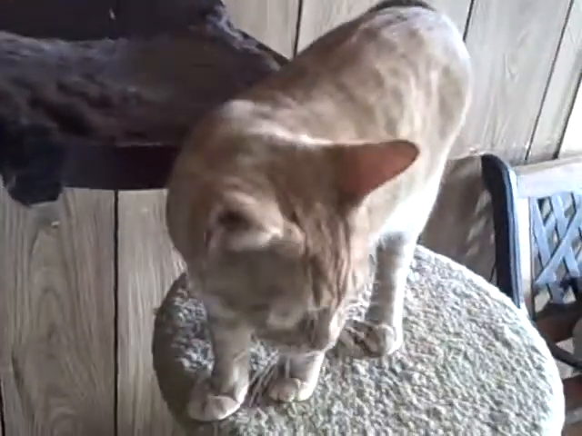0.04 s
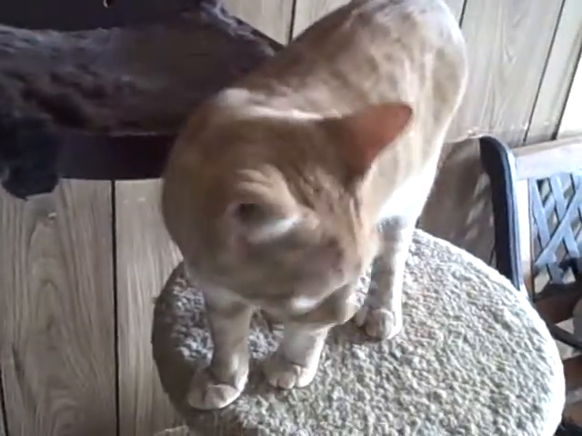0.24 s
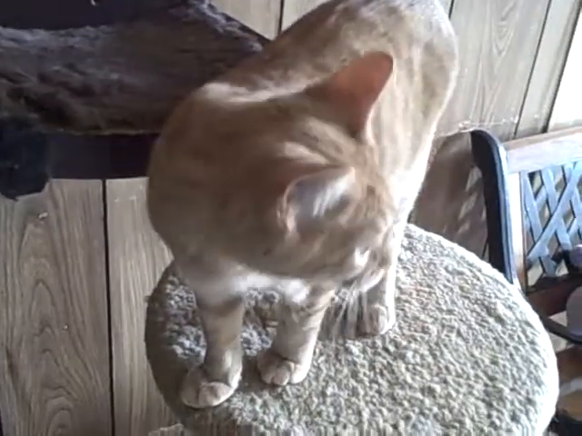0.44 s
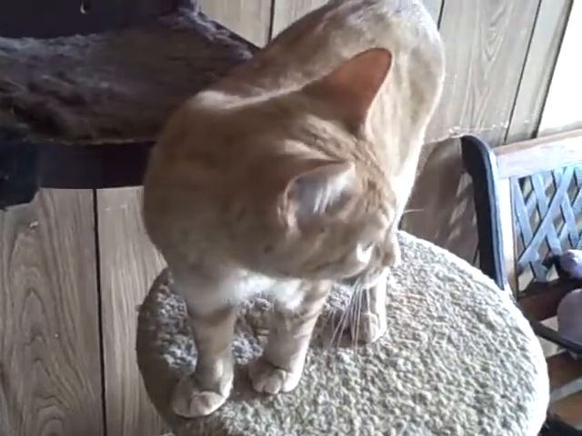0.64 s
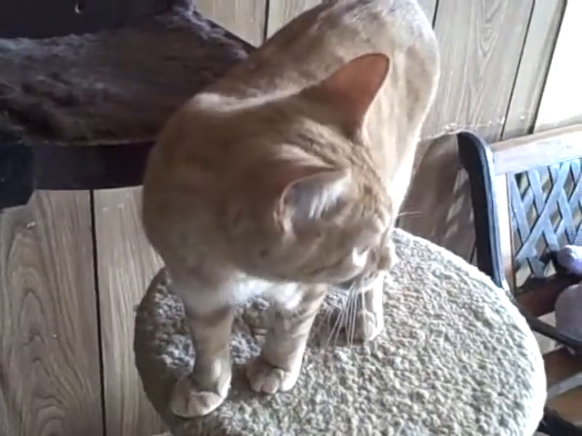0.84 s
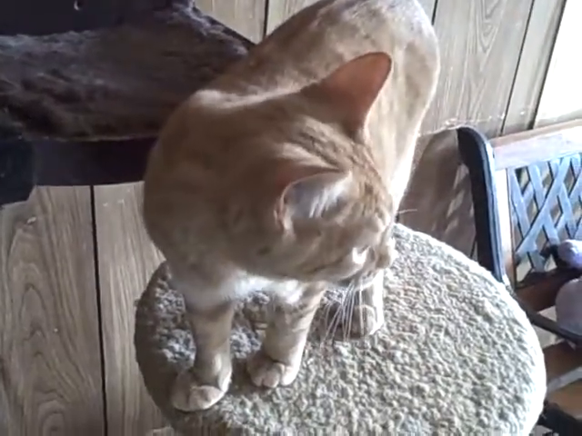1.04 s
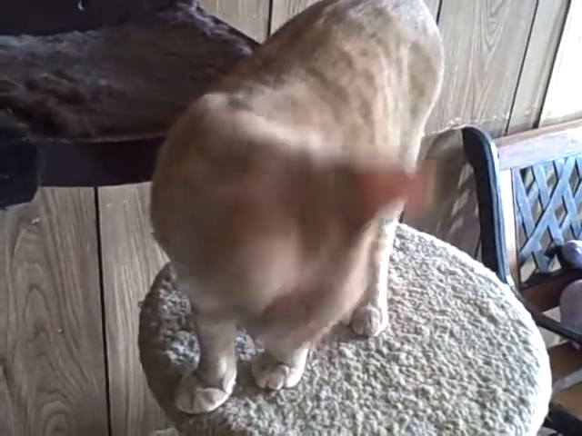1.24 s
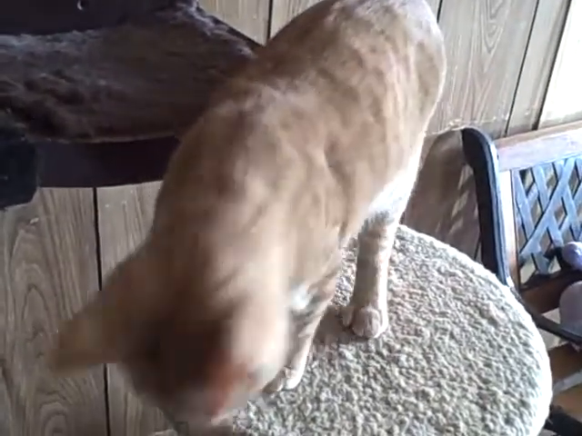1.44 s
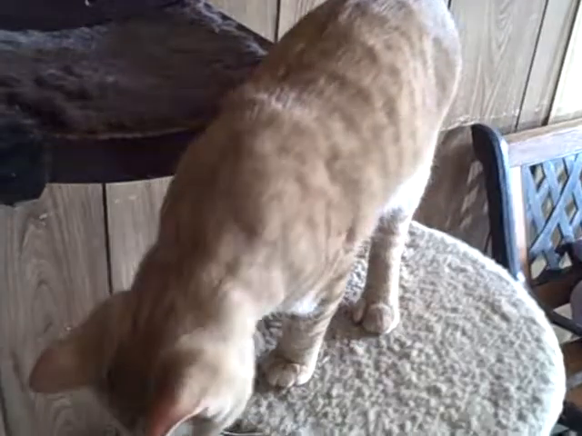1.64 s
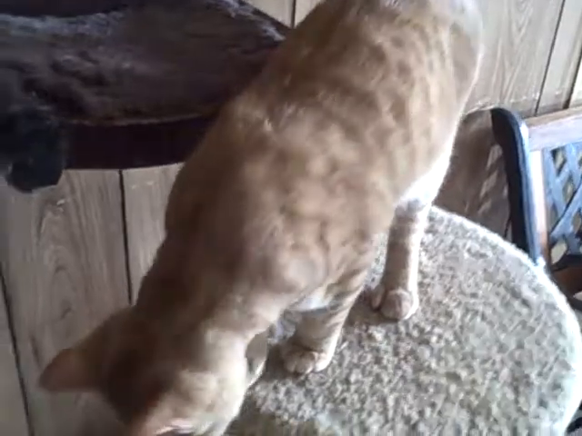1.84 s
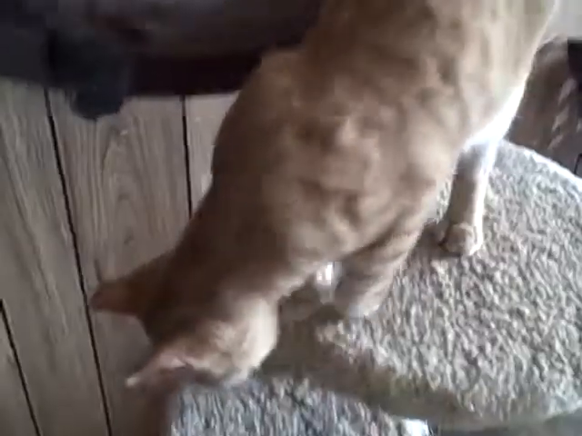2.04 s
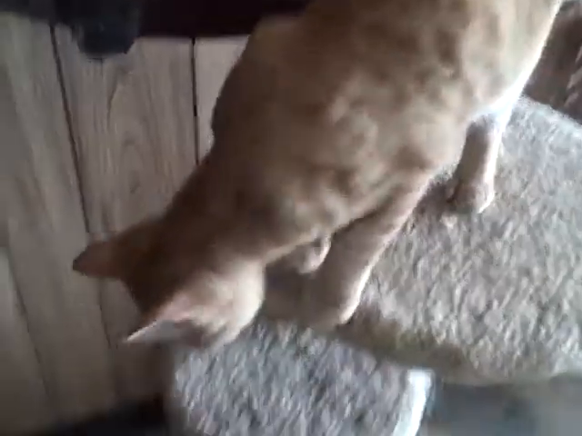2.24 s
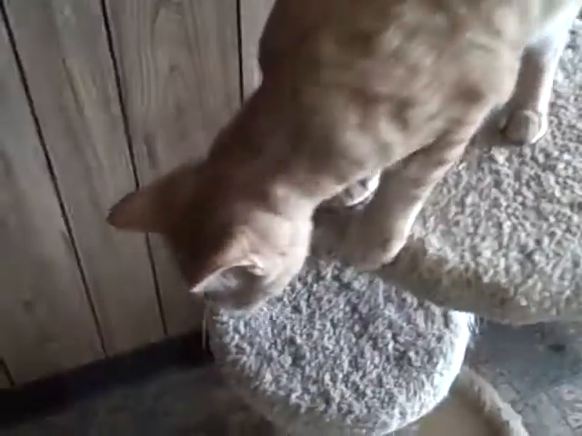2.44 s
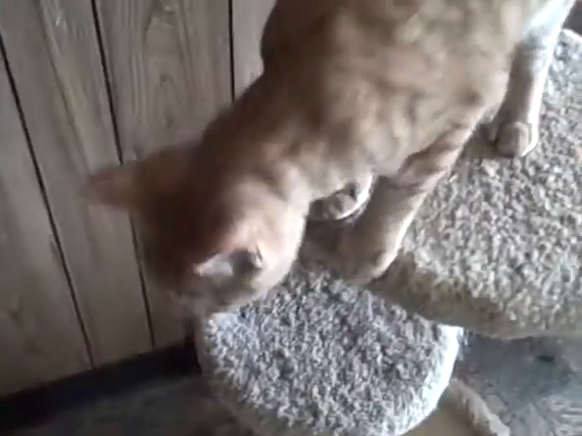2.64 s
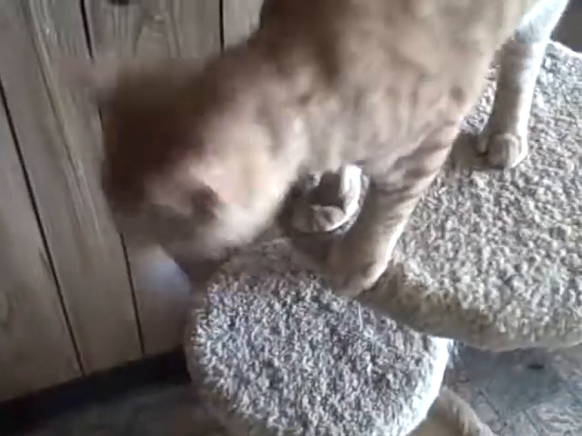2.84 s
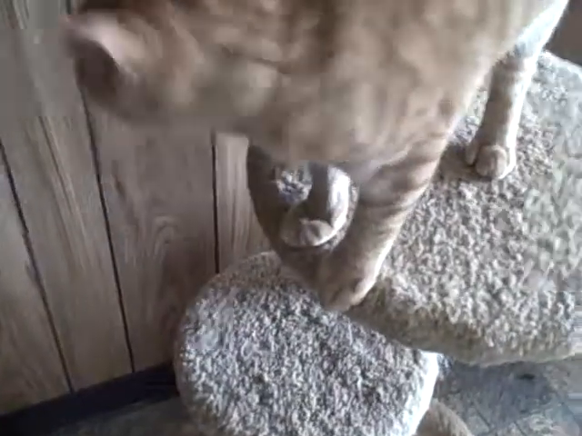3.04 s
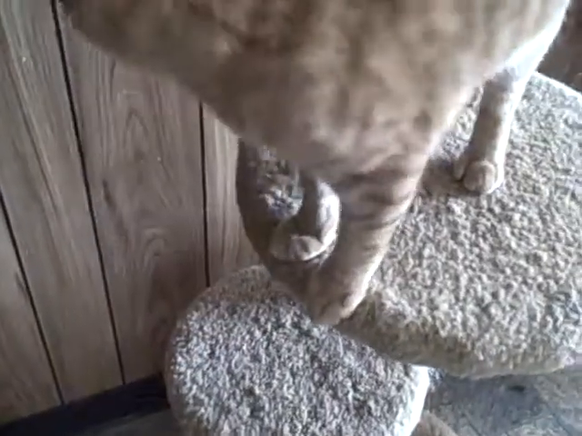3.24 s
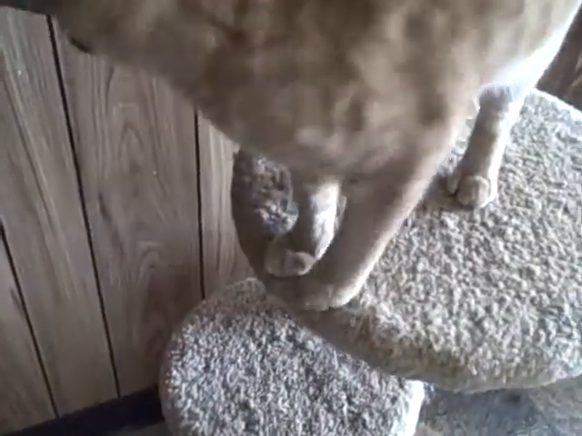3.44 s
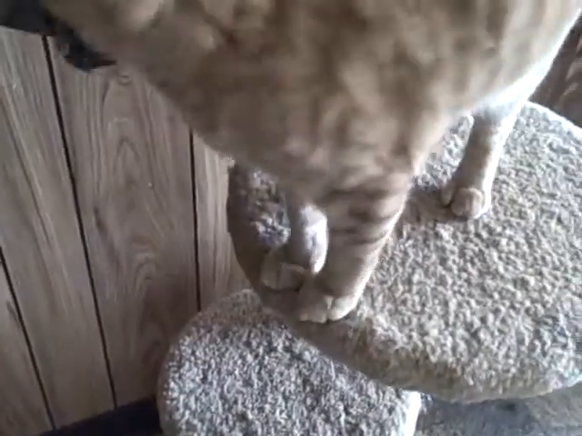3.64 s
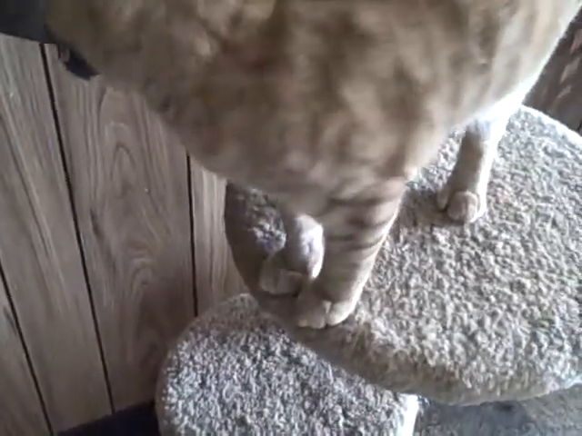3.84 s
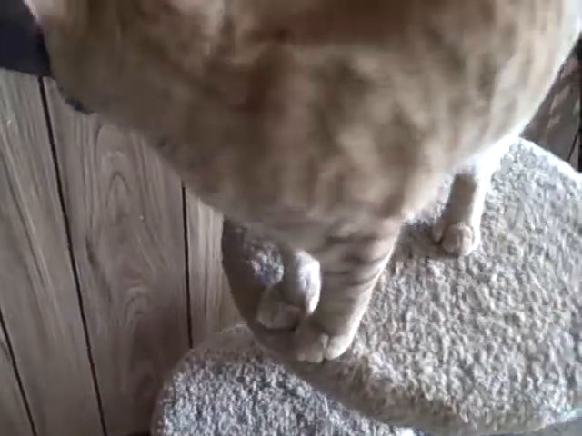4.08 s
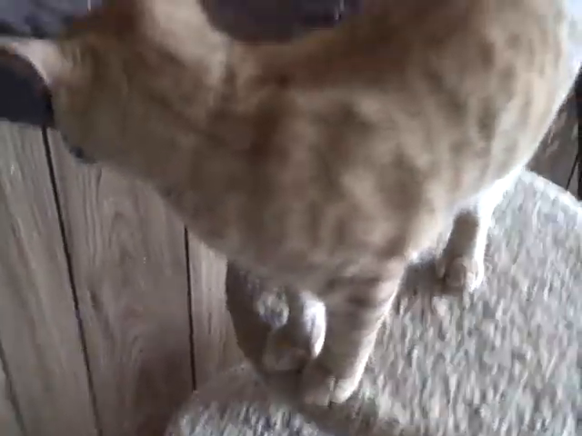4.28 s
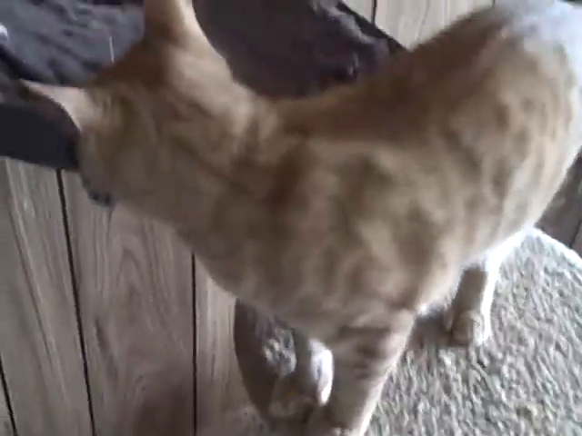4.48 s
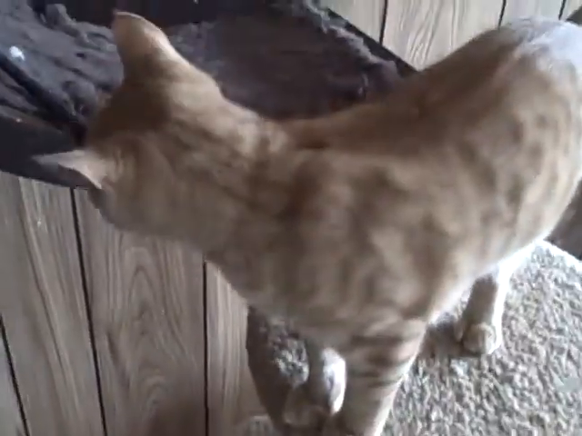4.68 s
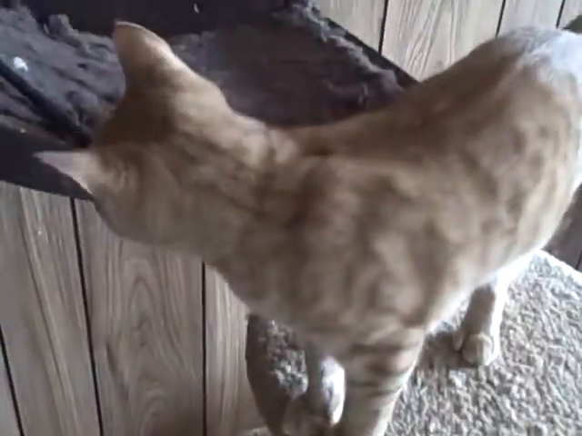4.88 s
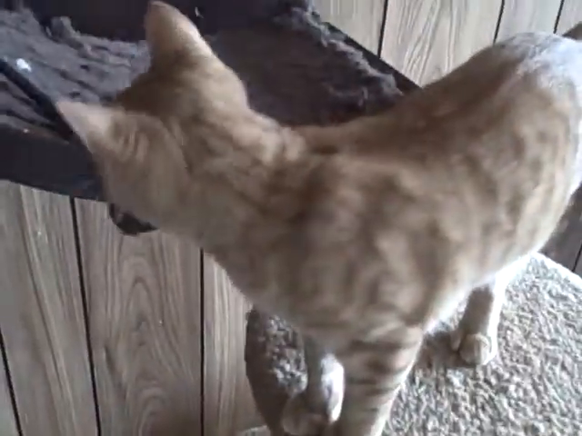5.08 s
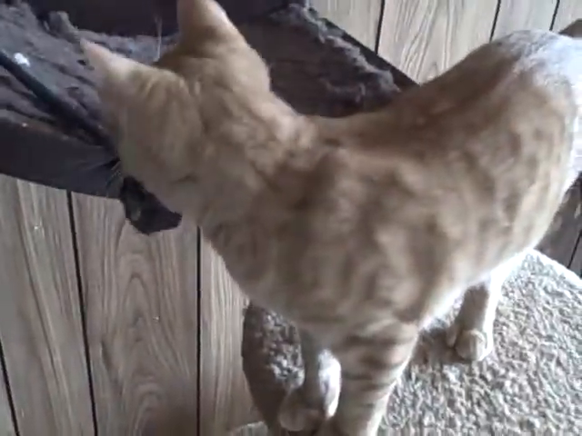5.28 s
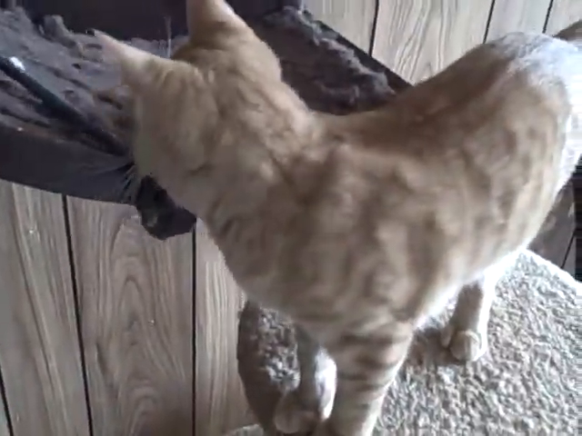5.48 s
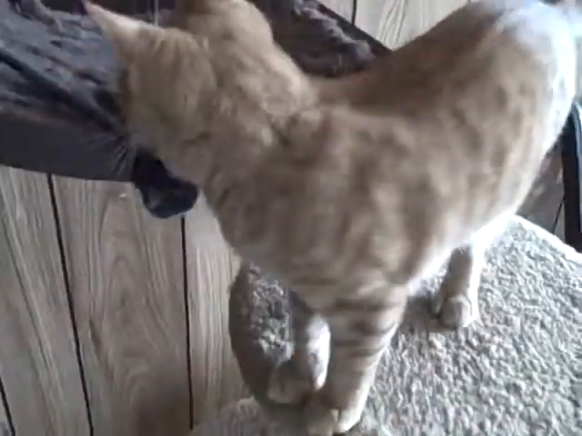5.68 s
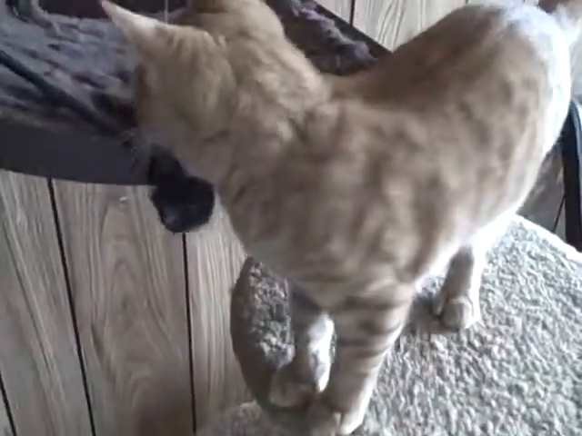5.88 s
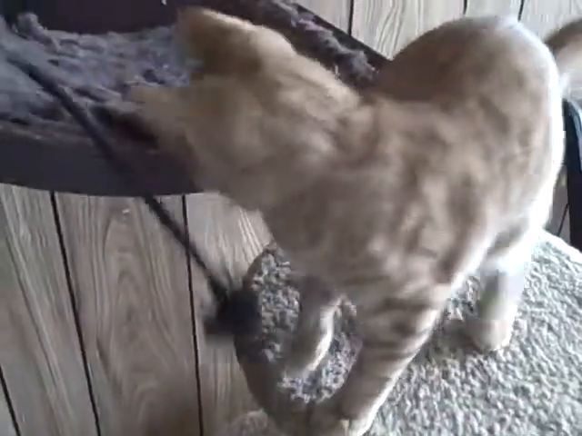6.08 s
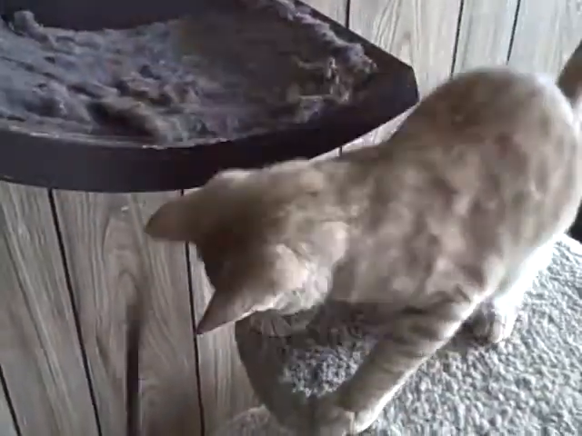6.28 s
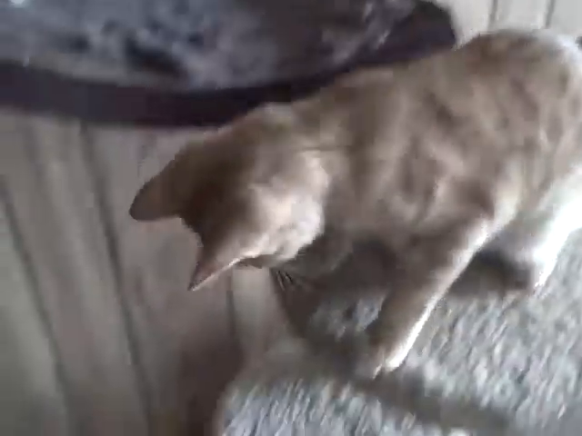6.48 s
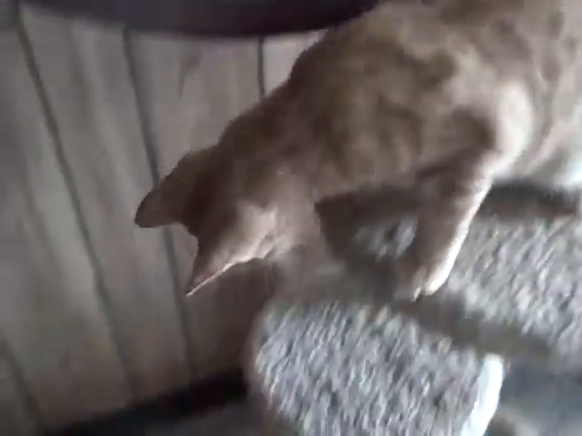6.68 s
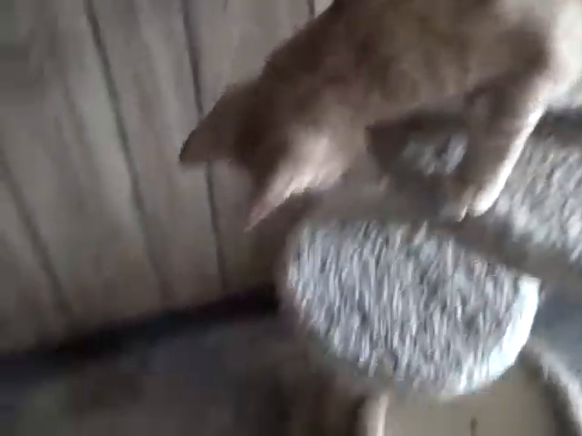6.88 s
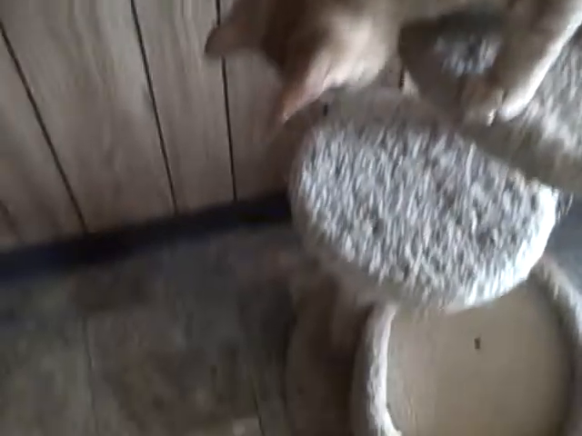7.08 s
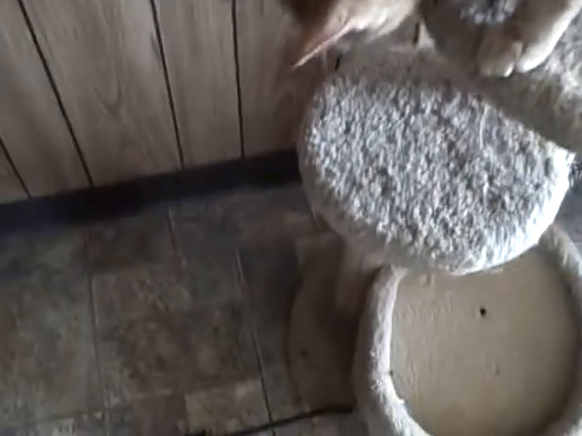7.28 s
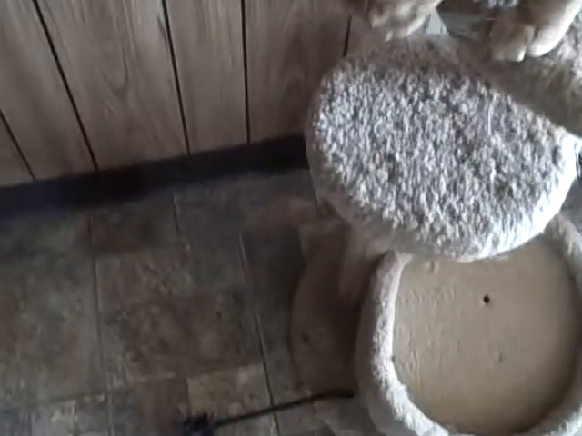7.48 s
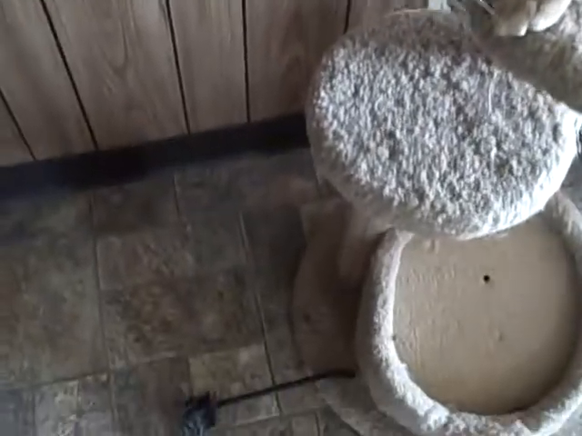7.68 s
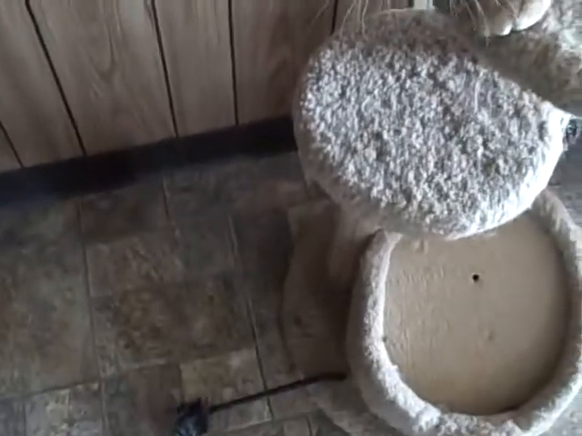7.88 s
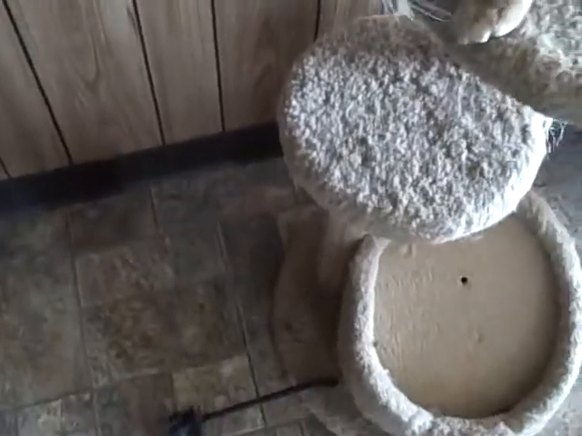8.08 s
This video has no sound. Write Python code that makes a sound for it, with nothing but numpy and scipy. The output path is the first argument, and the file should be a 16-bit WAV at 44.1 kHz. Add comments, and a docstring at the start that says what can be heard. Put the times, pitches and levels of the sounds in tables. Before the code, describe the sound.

A small cat shifts on a carpeted cat tree with faint wooden knocks and claw ticks, then a toy wand clacks sharply onto tiles and rattles.

```python
"""A cat shifts about on a carpeted wooden tree in a small panelled room, near a phone. Boards thud as sums of
fading sines; claws and a toy wand tick as short noise through small ringing bodies. Fur and cloth scuff as
clumpy noise, some hits trail off in the same grainy rattle, a joint creaks as a rising noise band, and the wand
drops to the tiles and bounces. A faint high whistle slides up and stops. Steady shaped noise makes the hiss and
low household rumble, and a second, uneven noise layer makes the cat's shifting weight. Random taps add the
room's echo."""
import sys
import numpy as np
from scipy import signal
from scipy.fft import rfft, irfft
from scipy.io import wavfile
from scipy.ndimage import uniform_filter1d

SR = 44100
rng = np.random.default_rng(int(sys.argv[2]) if len(sys.argv) > 2 else 0)


def inscribe(sig):
    """Save sig as 16-bit PCM at rate SR to the path in sys.argv[1].

    A 1-D sig is mono; a 2-D sig holds one channel per row.
    Samples are clipped to [-1, 1] before scaling.
    """
    pcm = np.round(np.clip(np.atleast_2d(sig).T, -1, 1) * 32767)
    wavfile.write(sys.argv[1], SR, pcm.astype(np.int16))


N = 358091  # samples, about 8.1 s

# Microphone hiss and low household rumble, as a noise spectrum: (f/Hz, level/dB per Hz)
HISS_TONE = [(12, -14), (20, -4), (48, -2.5), (179, -0.5), (1240, -19), (2230, -19.5), (4030, -24.5),
             (15100, -28), (16400, -34.5)]
HISS_DB = -64  # rms

# Weight shifting on floor and tree, before the random lumps: (t/s, rms level/dB)
SHUFFLE_LEVELS = [(0.0, -61), (0.81, -69), (1.2, -64), (1.56, -75.5), (2.24, -64.5), (2.83, -69),
                  (3.82, -62), (3.98, -50), (4.16, -50), (4.32, -54), (4.43, -76), (4.93, -56), (5.22, -70),
                  (5.5, -65), (5.67, -65), (6.79, -58.5), (6.94, -66.5), (8.12, -62.5)]
# Spectrum of that shifting: (f/Hz, level/dB per Hz)
SHUFFLE_SPECTRUM = [(15, 1), (30, 0.5), (60, -2.5), (120, -13.5), (250, -23.5), (500, -31.5), (1000, -49.5),
                    (3000, -74.5)]

# Fur, carpet and cloth rubbing, and the grainy rattle that trails some hits such as the wand drop: (start t/s,
# t60/s, rms level before the swell and fade/dB, centre f/Hz, width/octaves)
SCUFFS_AND_RATTLES = [(.01, 0.11, -63, 2360, 0.3), (.52, .36, -73.5, 4070, .8), (.865, 0.049, -61, 8900, 1.6),
                      (.96, 0.65, -72, 3500, 0.71), (1.07, 0.28, -61, 3400, 0.88), (2.489, 0.12, -56.5, 6000, 6.2),
                      (2.523, 0.27, -44, 2200, 1.9), (2.64, 0.38, -63, 2240, 1.55), (2.765, 0.31, -62, 2230, 1.84),
                      (2.978, 0.086, -60.5, 2290, 0.33), (3.19, 0.45, -61.5, 8000, 2.7), (3.283, 0.13, -63.5, 8000, 2.8),
                      (3.565, .37, -67, 1530, 1), (3.657, 0.28, -66.5, 4670, .6), (4.045, 0.26, -66, 4530, .5),
                      (4.33, 0.5, -66.5, 1460, 1), (4.8, .59, -66, 1900, 2.2), (5.545, 0.56, -55, 2290, 1.4),
                      (5.582, 0.073, -51, 13000, 1.4), (5.65, 0.21, -51, 5700, 0.63), (5.89, 0.24, -63, 3920, 1.06),
                      (6.115, 0.25, -65.5, 1540, 0.98), (6.184, 0.28, -47.5, 2360, 1.1), (6.3, 0.81, -62.5, 3930, 2.1),
                      (6.511, .09, -47.5, 10100, 2.5), (6.58, 0.057, -25, 8000, 7.8), (6.605, 0.26, -43, 8000, 1.1),
                      (6.665, 0.53, -54.5, 8100, 1.9), (6.81, 0.75, -55.5, 7750, 4.7), (7.075, 0.38, -67, 12900, .7),
                      (7.075, 0.18, -69, 2400, 0.5), (7.338, 0.5, -58.5, 2070, 1.64), (7.495, 0.39, -65, 1590, 1.2)]
SCUFF_RISE_S, FIRM_SCUFF_DB, RISE_HALVING_DB = .01, -56, 20  # a firmer stroke starts faster

# Dull knocks on wood: (t/s, peak level/dB, centre f of the woken modes/Hz, width/octaves, contact rise/ms)
KNOCKS = [(.152, -51, 171, 0.75, 8), (.303, -48, 292, 0.32, 7.7), (1.28, -48.5, 597, 3.2, 0.73),
          (1.713, -45.5, 112, 0.83, 7.9), (1.981, -47, 506, 3.6, 1.5), (2.0945, -28, 194, 0.19, 2.43),
          (2.523, -42, 925, 0.89, 7.3), (2.986, -43, 304, 1.4, 8.5), (3.254, -51.5, 80, 0.54, 4.1),
          (3.578, -50, 313, 0.91, 16), (3.63, -53.5, 330, 0.89, 11), (3.788, -47, 242, 1.46, 5),
          (3.814, -39.5, 99, 0.87, 3.1), (3.849, -46.5, 283, 0.51, 3.7), (3.998, -39.5, 410, 0.66, 2.5),
          (4.011, -32, 277, 0.63, 4.2), (4.158, -40.5, 164, 0.46, 9.8), (4.178, -43, 167, 0.93, 4.2),
          (4.223, -41.5, 1170, 1.53, 1.9), (4.308, -46, 161, 0.58, 6.4), (4.716, -44, 205, 0.57, 2.8),
          (4.799, -51, 695, 1.16, 14), (4.879, -47.5, 150, 1.36, 8.8), (5.04, -45.5, 130, 1.24, 6.7),
          (5.099, -52, 200, 0.89, 3.7), (5.562, -49, 326, 1.2, 12), (6.1425, -23, 195, 0.89, 2.45),
          (6.5785, -12, 340, 1.82, 1.33), (6.809, -37.5, 466, 1.7, 3.1), (7.173, -56, 244, .85, 2.5),
          (7.25, -55.5, 300, 0.76, 1.6), (7.335, -40, 447, 2.2, 6), (7.493, -39.5, 303, 0.48, 7),
          (7.897, -46.5, 288.5, .45, 4.9), (7.96, -53, 242, 0.84, 5.3)]
# Ways the boards can ring, before detuning and damping: (f/Hz, level/dB, t60/s)
BOARD_MODES = [(69.8, -2.5, 0.062), (95.4, -7.5, 0.21), (123, -1, 0.049), (169, 0.5, 0.06),
               (216.2, 2.5, 0.043), (278.7, -2.5, 0.071), (350.6, -5, 0.07), (444.8, 2, 0.056),
               (508, -0.5, 0.061), (584.5, -1, 0.079), (694.4, -4, 0.061), (815, 4.5, 0.022),
               (903, 0, 0.041), (1049, 4.5, 0.03), (1142, -4.5, 0.05), (1347, -11.5, 0.085),
               (1450, -2.5, 0.066), (1663, 4.5, 0.028), (2030, -3.5, 0.054), (2230, -5, 0.039),
               (2460, -2, 0.068), (3110, -9, 0.095)]
# A softer, slower push damps the boards less: factor on t60 at a 4.8 ms rise, and its power law on the rise
RING_FACTOR, RING_REFERENCE_S, RING_POWER = 1.3, 0.0048, 0.76
# A hard contact also wakes the modes above the centre; a slower rise wakes them less
UPPER_MODES_DB, UPPER_DB_PER_OCTAVE, UPPER_DB_PER_MS = -7.5, -3, -2.5

# Sharp ticks of claws and plastic wand: (t/s, peak level/dB, centre f/Hz, width/octaves, t60 of the rattle/ms)
STRIKES = [(1.084, -51.5, 3400, 2.2, 19), (1.16, -47.5, 2000, 1.83, 28), (1.281, -50.5, 4900, 0.23, 19),
           (1.516, -58, 2250, 0.33, 41), (1.557, -44, 2100, 1.4, 40), (1.585, -50, 4500, 2, 24),
           (1.873, -61, 6500, .8, 20), (1.982, -43.5, 4740, 0.94, 14.5), (2.096, -40, 2270, .12, 74),
           (2.933, -46, 5000, 3.7, 50), (4.001, -52, 3780, 0.53, 35), (4.224, -54.5, 2300, 1, 50),
           (4.376, -43, 10000, 1.6, 9.6), (4.8, -53, 1870, .5, 40), (5.524, -45.5, 5660, .7, 8.1),
           (5.536, -44, 3680, 1.1, 11), (5.557, -39, 6200, 0.73, 5), (5.573, -19, 13100, 0.94, 6),
           (5.645, -46, 7000, .7, 13), (5.857, -57, 3700, 0.68, 15), (5.891, -46.5, 3300, 0.73, 28),
           (5.965, -58.5, 4000, .5, 11), (6.04, -63, 4000, .4, 10), (6.091, -60, 4170, 0.28, 12),
           (6.188, -50, 2470, 3.7, 30), (6.223, -34.5, 4950, 1, 24), (6.281, -46, 3320, 1.14, 39),
           (6.339, -46.5, 3470, 0.28, 35), (6.368, -49.5, 3500, 0.81, 17), (6.402, -43, 3360, 0.45, 35),
           (6.441, -50, 3920, 0.42, 18), (6.461, -51, 2960, .6, 20), (6.5792, -5, 5870, 1.36, 5.9),
           (6.5805, -8.5, 14360, 0.34, 6.2), (6.624, -29, 4270, 0.2, 22), (6.678, -28.5, 9000, 1.6, 25),
           (6.702, -33.5, 7000, 1.5, 10), (6.715, -48.5, 12400, 0.47, 14), (6.752, -46, 12000, 0.3, 14),
           (6.807, -28.5, 10000, 1.56, 30), (6.817, -36.5, 6000, 0.93, 23), (6.839, -41, 6160, .8, 15),
           (6.857, -44, 5570, .4, 22), (6.904, -44, 4570, 0.43, 24), (7.249, -58.5, 7200, 0.58, 30),
           (7.335, -33, 2250, 0.46, 47), (7.576, -52.5, 12400, 1.1, 20), (7.851, -50, 6000, 2.3, 25)]

WHISTLE_S, WHISTLE_END_S, WHISTLE_FADE_S = 1.18, 1.94, .03
# Middle rms level, the pitch it slides towards, the starting gap below it, and how fast the gap closes
WHISTLE_DB, WHISTLE_HZ, SLIDE_HZ, SLIDE_S = -87.5, 11170, 905, 0.16

CREAK_S, CREAK_END_S, CREAK_HZ, CREAK_END_HZ = 7.06, 7.148, 1050, 1558
CREAK_DB, CREAK_SWELL_DB = -57.5, 21  # level it swells towards, and how far below it starts

# How long the room's echo lasts: (f/Hz, t60/s)
ROOM_DECAY = [(60, 0.45), (200, 0.35), (700, 0.31), (2000, 0.21), (6000, 0.28), (14000, 0.15)]
EDGE_HZ = 16150  # upper frequency limit of the whole sound


def gain_of(db):
    """Turns decibels into a factor."""
    return 10 ** (np.asarray(db) / 20)


def evened(x):
    """Scales a signal to rms 1."""
    return x / np.sqrt(np.mean(x ** 2) + 1e-20)


def drifting(x, size, axis=-1):
    """Smooths noise over a number of steps, then scales it to rms 1."""
    return evened(uniform_filter1d(x, size=size, axis=axis))


def read_curve(points, hz):
    """Reads a (f/Hz, value) table, with straight lines on a log-frequency axis."""
    f, value = np.transpose(points)
    return np.interp(np.log(hz + 1), np.log(f + 1), value)


def bell(hz, centre_hz, octaves, order=4):
    """Gives a rounded band; a higher order makes its sides steeper."""
    distance = np.log2((hz + 1) / centre_hz)
    return 1 / (1 + abs(distance / max(octaves, .05)) ** order)


def band_of(x, hz, octaves):
    """Keeps the band around hz."""
    return irfft(rfft(x) * bell(np.fft.rfftfreq(len(x), 1 / SR), hz, octaves), len(x))


def add(mix, s, sound):
    """Mixes a sound in at s seconds."""
    part = mix[max(round(s * SR), 0):][:len(sound)]
    part += sound[:len(part)]


def played(rows, source):
    """Plays one sound for each table row, at its time."""
    mix = np.zeros(N)
    for s, *columns in rows:
        add(mix, s, source(*columns))
    return mix


def wash(tone, patchy_db):
    """Shapes ongoing noise to a spectrum, with patches that drift over time and pitch."""
    frames, hz = N // 512 + 5, np.fft.rfftfreq(2048, 1 / SR)
    real, imaginary, patches = rng.standard_normal((frames, 1025, 3)).T
    patches = uniform_filter1d(patches, size=20, axis=0)  # over pitch
    patches = drifting(patches, 8, axis=1)  # over time
    level_db = read_curve(tone, hz)[:, None] + patchy_db * patches
    spectrum = (real + 1j * imaginary) * gain_of(level_db)
    return evened(signal.istft(spectrum, nperseg=2048, noverlap=1536)[1][:N])


def hiss_and_rumble():
    """Microphone hiss and household rumble: noise with a steady overall level."""
    return gain_of(HISS_DB) * wash(HISS_TONE, patchy_db=.9)


def shuffle():
    """Weight shifts on floor and tree: mostly low noise whose level rises and falls."""
    s, db = np.transpose(SHUFFLE_LEVELS)
    lumps = uniform_filter1d(rng.standard_normal(N), size=1800)
    lumps_db = 4.9 * drifting(lumps, 1800)  # uneven small shifts
    level_db = np.interp(np.arange(N) / SR, s, db) + lumps_db
    return gain_of(level_db) * wash(SHUFFLE_SPECTRUM, patchy_db=1.2)


def scuff(t60, db, hz, octaves):
    """Many fibres let go in clumps, or a hit rattles on: grainy noise that swells and fades."""
    t = np.arange(SR // 2) / SR
    rise = SCUFF_RISE_S * 2 ** ((FIRM_SCUFF_DB - db) / RISE_HALVING_DB)
    fibres, clumps = rng.standard_normal((2, len(t)))
    fibres = fibres * gain_of(2.0 * drifting(clumps, 90))
    swell = np.minimum(t / max(rise, 1e-3), 1)
    fade = gain_of(-60 * np.maximum(t - rise, 0) / max(t60, 1e-3))
    return gain_of(db) * evened(band_of(fibres, hz, octaves)) * swell * fade


def thud(db, centre_hz, octaves, rise_ms):
    """A padded push rings the boards; the chosen band and softness pick the modes, chance their detuning and phase."""
    t = np.arange(12288) / SR
    hz, level_db, t60 = np.transpose(BOARD_MODES)[..., None]
    rise = max(rise_ms, .1) / 1000
    ring_t60 = t60 * RING_FACTOR * (rise / RING_REFERENCE_S) ** RING_POWER

    detune, phase = rng.uniform(-1.14, 1, (2, len(BOARD_MODES), 1))
    mode_hz = hz * (1 + 0.053 * detune)
    modes = gain_of(level_db - 60 * t / ring_t60) * np.sin(2 * np.pi * mode_hz * t + np.pi * phase)

    # Loose joints and carpet roughen each ring, the higher modes most
    rattle = drifting(rng.standard_normal(modes.shape), 130, axis=1)
    modes = modes * (1 + 1.21 * rattle * np.minimum(hz / 900, 1) * np.minimum(t / 0.01, 1))

    upper_db = UPPER_MODES_DB + UPPER_DB_PER_MS * rise_ms + UPPER_DB_PER_OCTAVE * np.log2(hz / centre_hz)
    upper = (hz > centre_hz) * gain_of(upper_db)
    woken = np.maximum(bell(hz, centre_hz, octaves, order=3), upper)
    sound = (woken * modes).sum(0) * (1 - np.exp(-t / rise))
    return gain_of(db) * sound / abs(sound).max()


def tick(db, hz, octaves, t60_ms):
    """A sharp strike and its rattle pass a small body with a few chance resonances, which rings only afterwards."""
    t = np.arange(4096) / SR
    t60 = t60_ms / 1000
    rattle, ripple = rng.standard_normal((2, len(t)))
    fade = gain_of(-60 * t / max(t60, 1e-3))
    rise = 1 - np.exp(-t / max(0.024 * t60, 1e-5))
    drive = 0.39 * rattle * fade * rise
    drive[0] = 0.94  # the strike itself

    f = abs(np.fft.fftfreq(len(t), 1 / SR))
    bins = np.round(f * len(t) / SR).astype(int)
    ripple_db = 1.6 * drifting(ripple, 40)[bins]
    log_gain = np.log(bell(f, hz, octaves) * gain_of(ripple_db) + 1e-4)
    body = np.exp(np.conj(signal.hilbert(log_gain)))  # phase that makes the ringing follow the strike
    sound = np.fft.ifft(np.fft.fft(drive) * body).real
    return gain_of(db) * sound / abs(sound).max()


def whistle():
    """A faint sine slides up towards its pitch, wavering a little in pitch and level."""
    t = np.arange(N) / SR
    hz = WHISTLE_HZ - SLIDE_HZ * np.exp(-np.maximum(t - WHISTLE_S, 0) / SLIDE_S)
    waver_hz = 25 * drifting(rng.standard_normal(N), 900)
    fades = np.clip(np.minimum(t - WHISTLE_S, WHISTLE_END_S - t) / WHISTLE_FADE_S, 0, 1)
    level_db = WHISTLE_DB + 3.4 * drifting(rng.standard_normal(N), 1500)
    level = np.sqrt(2) * fades * gain_of(level_db)  # a sine of height sqrt(2) has rms 1
    return level * np.sin(2 * np.pi * np.cumsum(hz + waver_hz) / SR)


def creak():
    """A joint slips roughly: noise in a narrow band that climbs and swells, then stops."""
    u = np.linspace(0, 1, round((CREAK_END_S - CREAK_S) * SR))  # progress from start to end
    cycles = np.cumsum(CREAK_HZ + (CREAK_END_HZ - CREAK_HZ) * u ** 2) / SR
    a, b = uniform_filter1d(rng.standard_normal((2, 8192)), size=50, axis=1)[:, :len(u)]
    slips = evened(a * np.cos(2 * np.pi * cycles) + b * np.sin(2 * np.pi * cycles))
    swell = gain_of(CREAK_DB - CREAK_SWELL_DB * (1 - u))
    stop = np.minimum((1 - u) / .08, 1)
    return swell * stop * slips


def room(x):
    """Sparse random taps, each band dying at its own speed; three tails take turns so no fixed resonance stands out."""
    taps = np.zeros((3, SR))
    at = np.arange(300, SR - 20, 20) + rng.integers(0, 20, (3, (SR - 301) // 20))
    np.put_along_axis(taps, at, rng.choice([-1., 1.], at.shape), 1)
    hz, t, bands = signal.stft(taps, SR, nperseg=512)
    decay = gain_of(-60 * t / read_curve(ROOM_DECAY, hz)[:, None])
    tails = signal.istft(bands * decay, SR, nperseg=512)[1]

    cycles = np.arange(N) / SR * 1.3 + np.arange(3)[:, None] / 3  # a steady 1.3 turns a second
    turns = np.cos(2 * np.pi * cycles) * np.sqrt(2 / 3)
    return signal.fftconvolve(x * turns, tails / np.linalg.norm(tails[0]), axes=1)[:, :N].sum(0)


def scene():
    """Mixes knocks, ticks, scuffs and creak with their echoes, over shuffle, hiss and whistle."""
    scuffs, thuds, ticks = played(SCUFFS_AND_RATTLES, scuff), played(KNOCKS, thud), played(STRIKES, tick)
    add(scuffs, CREAK_S, creak())
    echoes = room(gain_of(-5.5) * thuds + gain_of(-14) * ticks + gain_of(-13) * scuffs)
    mix = thuds + ticks + scuffs + echoes + shuffle() + hiss_and_rumble() + whistle()
    return mix[None]


def record(dry):
    """A steep low-pass filter removes the highest treble."""
    low_pass = signal.firwin(511, EDGE_HZ, window=("kaiser", 9), fs=SR)
    return signal.oaconvolve(dry, low_pass[None], "same")


dry = scene()
out = record(dry)
inscribe(out)
```